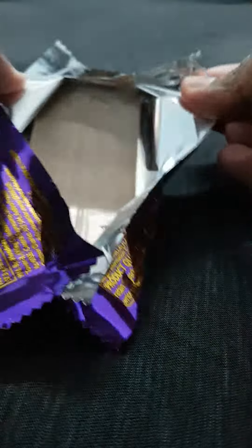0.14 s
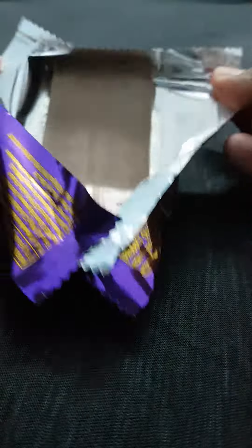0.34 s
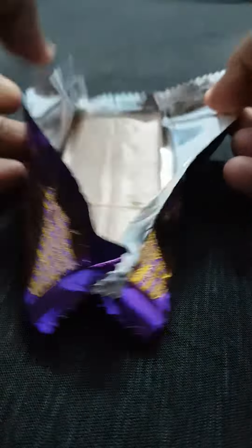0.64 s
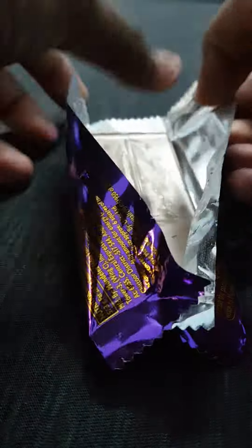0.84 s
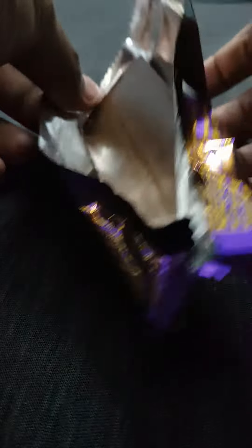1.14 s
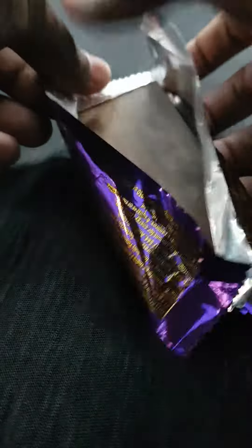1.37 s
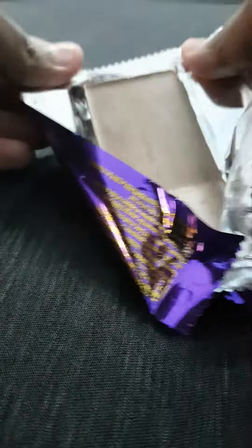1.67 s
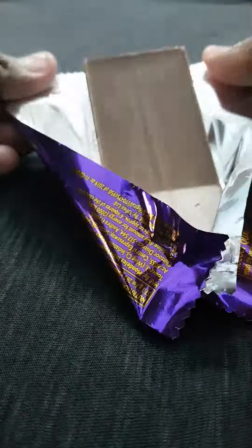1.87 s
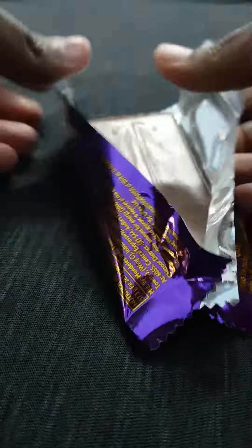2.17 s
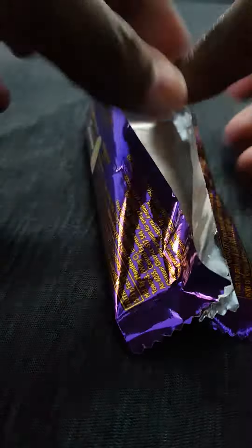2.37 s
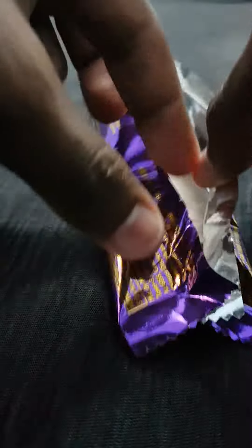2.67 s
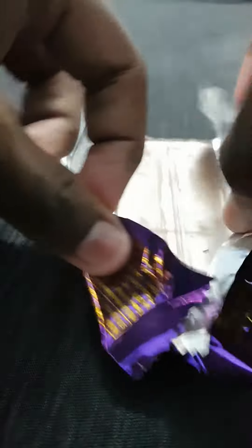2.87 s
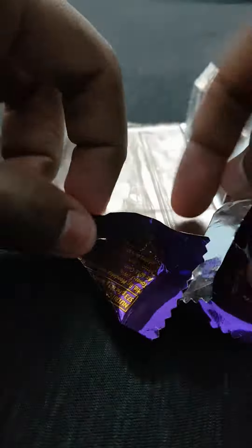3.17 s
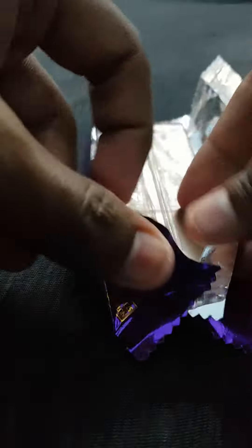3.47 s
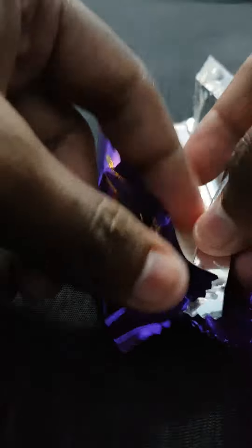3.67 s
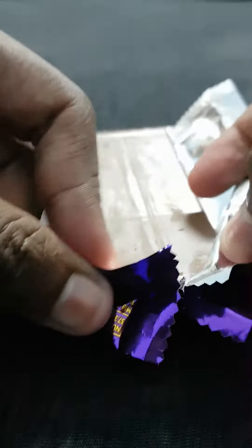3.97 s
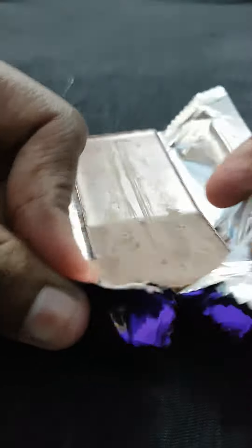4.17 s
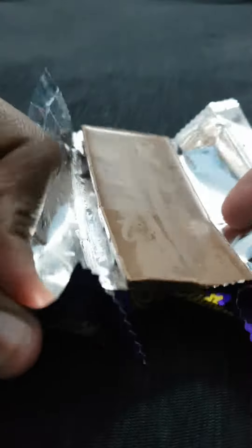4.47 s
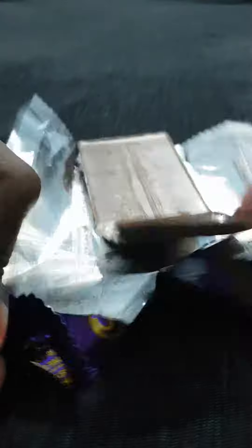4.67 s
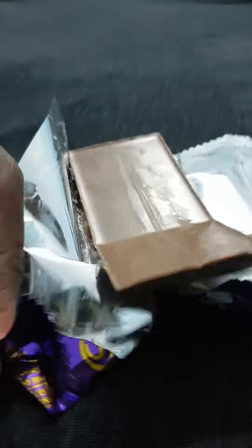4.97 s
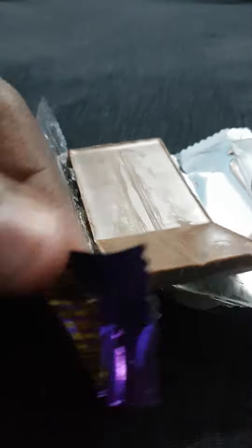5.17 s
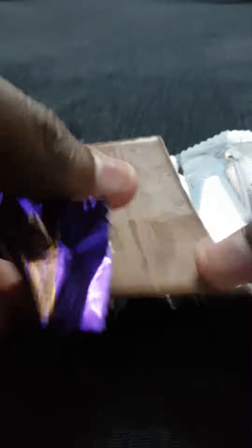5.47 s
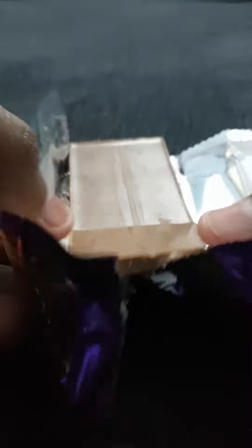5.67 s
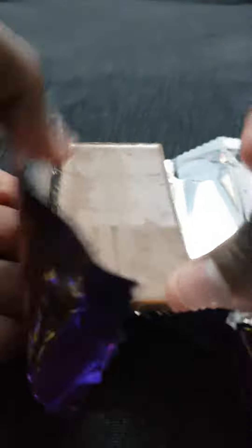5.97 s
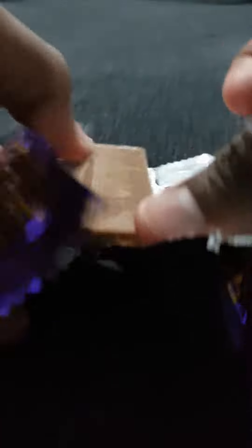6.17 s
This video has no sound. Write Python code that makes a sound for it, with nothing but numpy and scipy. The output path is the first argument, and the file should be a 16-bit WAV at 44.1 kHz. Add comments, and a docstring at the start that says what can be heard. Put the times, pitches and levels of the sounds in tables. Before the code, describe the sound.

Fingers crinkle and peel a stiff foil wrapper right at the microphone, irregular snaps densest after four seconds, over dull rubbing and quiet hiss

```python
"""Fingers peel a foil-lined wrapper off a chocolate bar on a cloth, a hand's width from a phone in a small room.
From the start, creases buckle with sharp cracks and short rings, made from shaped noise around a sudden step.
Between them come faint foil ticks, showers of tiny crackles and, from about one second, sine-wave bumps on the cloth.
After four seconds a foil flap slides free, made of dense random slips through a resonance; more snaps follow.
Throughout, filtered noise gives dull rubbing, a low fan-like rush and a soft hiss, and the room briefly echoes."""
import sys
import numpy as np
from scipy import signal
from scipy.fft import rfft, irfft
from scipy.io import wavfile
from scipy.ndimage import uniform_filter1d

SR = 44100
rng = np.random.default_rng(int(sys.argv[2]) if len(sys.argv) > 2 else 0)


def dump(signal):
    """Clip the signal to [-1, 1] and save it as 16-bit WAV at the path in sys.argv[1]."""
    limited = np.clip(np.atleast_2d(signal).T, -1, 1)
    pcm = np.round(limited * 32767).astype(np.int16)
    wavfile.write(sys.argv[1], SR, pcm)


N = 279153
TIME = np.arange(N) / SR  # seconds

# loud creases snapping through, level before left-right placing: start_s, energy_db, crack_hz, ring_hz
SNAPS = [(0.146, 4.5, 900, 7600), (0.1635, -2.5, 600, 5460), (0.1742, -4.5, 1560, 2290),
         (0.2634, 2.5, 6300, 5560), (0.2802, -4, 2620, 5710), (0.292, 2, 5030, 8100),
         (0.2984, 1.5, 1670, 5650), (0.302, -3, 990, 2230), (0.345, -6, 3110, 4580),
         (0.859, 1.5, 2170, 4550), (1.0926, 2.5, 5700, 5500), (1.1237, -1.0, 2230, 5200),
         (1.2484, 2, 2200, 2870), (1.318, -15, 9000, 12000), (1.5083, -2.5, 4000, 2170),
         (1.5461, 5, 2060, 5050), (1.7032, -3, 1680, 3130), (1.764, 3.5, 4800, 6600),
         (1.8262, 5, 1510, 1260), (1.835, -5.5, 1800, 3400), (1.8456, 4.5, 2400, 3460),
         (1.8553, -4.5, 2000, 4670), (2.0396, 1.5, 1340, 9200), (2.2245, 0, 1110, 4600),
         (2.2646, 0.5, 2410, 12000), (2.7892, -3.5, 1850, 6750), (2.8195, 3, 1650, 2090),
         (2.8344, 6, 3960, 1980), (2.8843, -1.5, 1700, 4800), (3.002, -4, 1650, 3650),
         (3.259, 1.5, 2040, 4870), (3.2847, 4, 2380, 4600), (3.3077, 0.5, 1730, 4500),
         (3.3415, 4.5, 3400, 6600), (3.6895, -7.5, 710, 825), (3.7459, 6.0, 3500, 1730),
         (3.8114, 1, 2960, 3920), (3.8906, 3.0, 2560, 1900), (3.9007, 6.5, 4040, 6600),
         (3.9702, 1, 3670, 5560), (4.1432, 4, 2200, 1970), (4.1906, 5.5, 2200, 4240),
         (4.195, 7.5, 1430, 4400), (4.2261, 7.5, 2620, 2170), (4.2297, 7.5, 1840, 6500),
         (4.2534, 0.5, 603, 2320), (4.358, 4, 1440, 1400), (4.399, 3.5, 3390, 1140),
         (4.6371, 3.5, 1310, 1980), (4.6482, -5, 1300, 2020), (4.6567, 8, 1690, 1170),
         (4.6697, 9, 2850, 3620), (4.6981, 6, 2030, 4100), (4.7073, 2, 1700, 6220),
         (4.7414, 1.5, 1550, 2300), (4.75, -2.5, 2620, 3420), (5.1495, -1.5, 1560, 5100),
         (5.2233, 0.5, 1390, 5370), (5.4528, -3, 3390, 1380), (5.5738, 0.5, 2850, 4730),
         (5.5948, 4.5, 2040, 5600), (5.6022, 2.5, 520, 5400), (6.1327, 3.5, 5870, 5650),
         (6.155, 0.5, 5710, 5960), (6.1986, 3, 1320, 5500), (6.2242, -3.5, 2020, 5960),
         (6.2516, -1.5, 2620, 3030)]
# patches of film crushed or dragged in one go, levels relative to each other: start_s, length_s, level_db, centre_hz
CRUSHES = [(0.61, 0.039, -36.5, 1970), (1.221, 0.17, -42.5, 2050), (2.036, 0.13, -41, 1970),
           (2.762, 0.071, -41.5, 2400), (3.299, 0.015, -29.5, 2660), (4.347, 0.048, -32.5, 1500),
           (4.634, 0.11, -34, 1460), (6.25, 0.046, -36.5, 3220)]
# faint ticks of the loose foil lining as it settles: start_s, energy_db
TICKS = [(0.1076, -12.5), (0.5503, -10), (0.652, -15), (0.6838, -5.5), (1.046, -15.5), (1.2301, -10),
         (1.239, -10), (1.301, -10), (1.3606, -14), (1.6005, -12.5), (1.693, -11), (1.7906, -11),
         (2.0016, -12.5), (2.1051, -14), (2.145, -6), (2.5956, -21.5), (2.6767, -10.5), (2.798, -11),
         (2.8044, -12), (2.965, -9.5), (3.071, -18.5), (3.155, -12), (3.1864, -16), (3.4858, -9.5),
         (3.5865, -13.5), (3.698, -11), (4.1084, -2), (4.1318, -7), (4.1396, -3.5), (4.918, -20.5),
         (5.0175, -21), (5.0524, -5.5), (5.4906, -10.5), (5.5476, -16), (5.625, -13), (5.8134, -11.5),
         (5.8723, -9), (5.932, -10), (6.001, -7.5), (6.0653, -12), (6.111, -12.5), (6.1427, -5.5)]
# soft knocks of bar and fingers: start_s, level_db, pitch_hz
BUMPS = [(1.019, -7.5, 136), (2.103, -5, 144), (2.43, -12, 151), (2.649, -11, 189), (2.927, -11.5, 120),
         (3.679, -13, 127), (4.354, -10.5, 280), (4.707, -11, 305), (4.721, -13, 249), (4.73, -10, 265),
         (5.337, -12.5, 163), (5.594, -18, 312)]
# rise and fall of hands shifting the bar on the cloth, relative: time_s, level_db
RUBBING = [(0.0, -46), (0.23, -56), (1.0, -33), (1.22, -41), (1.25, -31), (1.37, -38), (1.5, -34.5),
           (2.13, -36), (2.34, -54), (2.43, -36.5), (2.84, -54.5), (2.87, -33.5), (3.56, -49), (3.67, -31),
           (3.84, -45.5), (4.09, -34), (4.5, -49.5), (4.74, -36.5), (5.1, -45.5), (6.26, -41), (6.33, -31)]
# tone colour of the left microphone port: pitch_hz, gain_db
LEFT_PORT = [(100, 7.5), (400, 0), (700, 5), (2000, 0.5), (3300, 0.5), (4400, 0), (7700, -5), (8700, -7.5),
             (10500, -0.5), (15000, -8)]
# tone colour of the right microphone port: pitch_hz, gain_db
RIGHT_PORT = [(400, 8), (750, 3.5), (1300, -6.5), (2000, -8), (3000, -4), (4400, 3), (5700, -1),
              (6600, -9.5), (7800, -4.5), (9000, -13.5), (12000, -4), (15000, -11.5)]
# tone colour of the room's low rush, relative: pitch_hz, gain_db
RUSH = [(25, -19), (58, -8.5), (150, 3.5), (240, 2.5), (305, 1), (330, 4.5), (355, 0), (450, -4.5),
        (600, -16), (1200, -58)]
# slow swelling and sinking of the rush: time_s, level_db
SWELL = [(0, -46.5), (.8, -39), (2.5, -36.5), (5.4, -41), (6.33, -36)]
# tone colour of the room's broad hiss, relative: pitch_hz, gain_db
HISS = [(300, -10), (750, 4), (1400, 6.5), (2500, 1.5), (4400, -13.5), (7600, -14.5), (9000, -20),
        (15000, -27)]

FACET_HZ = 3000  # pitch of a middling facet, a small flat piece of film between creases
LEAD_S = 0.003  # time kept for creeping before a crease snaps
LAG_S = 0.00014  # usual extra delay of wrapper sounds at the right port
# the crack is broad; the ring is narrow and a little weaker
CRACK_Q, RING_Q, RING_DB = 0.62, 7.5, -1.5
# the sliding flap: at SLIDE_DECAY_S after its start the fade has reached half
SLIDE_S, SLIDE_DB, SLIDE_DECAY_S, SLIDE_HZ = 4.234, -23, 0.04, 2400
# bumps at this pitch reach both ports alike; deeper ones are weaker at the right port
BUMP_EVEN_HZ, BUMP_LEFT_DB_PER_OCTAVE = 310, 15
TOP_HZ = 15900  # upper edge of the sound the phone keeps


def amp(db):
    """Turn decibels into a gain."""
    return 10 ** (np.asarray(db) / 20)


def unit(x):
    """Scale to an average (rms) level of 1."""
    return x / np.sqrt(np.mean(x ** 2))


def unit_energy(x):
    """Scale so that the squared samples add up to 1."""
    return x / np.sqrt(np.sum(x ** 2))


def walk(rate):
    """Wander between random values, with rate new values a second and a spread near 1."""
    knots = rng.standard_normal(2048)
    return np.interp(TIME * rate, np.arange(len(knots)), knots)


def colour(x, points, size=4096):
    """Filter to the gains in (Hz, dB) points, with no sound ahead of its cause (minimum phase)."""
    hz, db = np.transpose(points)
    bin_hz = np.arange(size // 2 + 1) * SR / size
    gain_db = np.interp(np.log(bin_hz + 1), np.log(hz), db)
    cepstrum = irfft(np.log(amp(gain_db)))
    # fold the backward half onto the forward half
    cepstrum[1:size // 2] *= 2
    cepstrum[size // 2 + 1:] = 0
    response = irfft(np.exp(rfft(cepstrum)))
    return signal.fftconvolve(x, response)[:N]


def resonate(x, hz, q):
    """Boost one pitch region relative to the rest; a higher q makes it narrower and ring longer."""
    w = 2 * np.pi * hz / SR
    a = np.sin(w) / (2 * q)
    return signal.lfilter([a, 0, -a], [1 + a, -2 * np.cos(w), 1 - a], x)


def add(track, start, sound):
    """Mix a sound into a track at a time in seconds."""
    i = int(np.clip(start * SR, 0, N - 1))
    track[i:i + len(sound)] += sound[:N - i]


def snaps(pan_db=6.0, left_db=3, settle_s=1.0, aside=0.72):
    """Loud creases: each facet faces its own way, and the wrapper drifts from the left to the middle."""
    out = np.zeros((2, N))
    chances = rng.uniform(-1, 1, (len(SNAPS), 2))
    for (s, db, hz, ring_hz), (facing, place) in zip(SNAPS, chances):
        left = snap(hz, ring_hz)
        # the right port hears a partly different version of the same snap
        right = unit_energy(left + aside * snap(hz, ring_hz))
        pan = pan_db * facing + left_db * np.exp(-s / settle_s)
        lag = LAG_S * (1 + place / 2)
        add(out[0], s - LEAD_S, left * amp(db + pan / 2))
        add(out[1], s - LEAD_S + lag, right * amp(db - pan / 2))
    return out


def snap(hz, ring_hz):
    """A broad crack and the short ring of the facet that flipped, with energy 1."""
    crack = buckle(hz, CRACK_Q)
    ring = amp(RING_DB) * buckle(ring_hz, RING_Q)
    return unit_energy(crack + ring)


def buckle(hz, q, creep=0.55, creep_s=0.00053, slip=0.3, slip_s=0.0008, flutter=0.13, flutter_s=0.0016,
           even=0.36, leak=0.28, quicker=0.45, size=800):
    """A crease flips: tiny slips gather, a sharp step comes after LEAD_S, then the sheet flutters. Energy 1."""
    # small, high facets flip faster than large, low ones
    t = (np.arange(size) / SR - LEAD_S) * (hz / FACET_HZ) ** quicker
    before = creep * np.exp(-abs(t) / creep_s)
    after = slip * np.exp(-abs(t) / slip_s) + flutter * np.exp(-abs(t) / flutter_s)
    push = rng.standard_normal(size) * np.where(t < 0, before, after)
    push[int(LEAD_S * SR)] += 1
    # partly flatten the push over frequency, so the facet decides more of the colour
    spectrum = rfft(push)
    spectrum = spectrum / uniform_filter1d(abs(spectrum), size=7) ** even
    # long waves leak around a small facet instead of radiating
    wave = 1j * np.arange(len(spectrum)) * SR / size
    radiated = irfft(spectrum * wave / (wave + leak * hz))
    return unit_energy(resonate(radiated, hz, q))


def crushes(crush_db=4, per_s=420, octaves=1.0, spread_db=4, q=1.46, fade_db=-7):
    """Dense avalanches of creases that ease off as the film gives."""
    out = np.zeros((2, N))
    usual_db = np.mean([row[2] for row in CRUSHES])
    for s, length, db, hz in CRUSHES:
        n = int(length * SR)
        # a harder crush sets off more creases
        rate = np.full(n, per_s * amp(db - usual_db))
        grains = shower(rate, hz, octaves, spread_db, q)
        fade = fade_db * np.linspace(-0.5, 0.5, n)
        grains = grains * signal.windows.tukey(n, 0.2) * amp(db + crush_db + fade)
        for track, sound in zip(out, grains):
            add(track, s, sound)
    return out


def slide(q=6.5, scrape_db=-4, scrape_q=0.3, spread_db=2.5, per_s=1100):
    """Dense, uneven slips scrape the foil and keep the loose flap ringing while it slows and fades."""
    t = np.maximum(TIME - SLIDE_S, 0)
    sizes = amp(spread_db * np.minimum(rng.exponential(size=(2, N)), 4))
    slipping = rng.random((2, N)) < per_s / SR
    slips = sizes * rng.choice([-1, 1], (2, N)) * slipping
    ringing = unit(resonate(slips, SLIDE_HZ, q))
    scrape = amp(scrape_db) * unit(resonate(slips, SLIDE_HZ, scrape_q))
    rise = 1 - np.exp(-t / LEAD_S)  # silent until SLIDE_S
    fade = 1 / (1 + (t / SLIDE_DECAY_S) ** 2)
    return unit(ringing + scrape) * amp(SLIDE_DB) * rise * fade


def ticks(hz=3600, q=1.6):
    """Each tick is one small facet of foil, of a slightly different size every time."""
    out = np.zeros((2, N))
    for (s, db), octave in zip(TICKS, rng.uniform(-0.5, 0.5, len(TICKS))):
        for track, lag in zip(out, (0, LAG_S)):
            add(track, s - LEAD_S + lag, buckle(hz * 2 ** octave, q) * amp(db))
    return out


def crackle(crackle_db=-49.0, per_s=90, hz=2700, octaves=1, spread_db=2.0, q=3.0,
            follow=0.235, rest=0.12, build_s=0.022, relax_s=0.05):
    """Stray ticks grow thicker and louder as film strain builds before a snap, then relax after it."""
    t = TIME[::100]  # strain changes slowly, so a coarse clock will do
    strain = np.zeros(len(t))
    for s, db, _, _ in SNAPS:
        distance = np.maximum((s - t) / build_s, (t - s) / relax_s)
        strain += amp(follow * db) * np.exp(-distance)
    strain = rest + np.interp(TIME, t, strain / strain.mean())
    grains = shower(per_s * np.sqrt(strain), hz, octaves, spread_db, q, count=14)
    return grains * np.sqrt(strain) * amp(crackle_db)


def shower(per_s, hz, octaves, spread_db, q, count=6):
    """Random tiny creases, most weak and a few strong, on facets around hz; per_s is the rate at each sample."""
    n = len(per_s)
    out = np.zeros((2, n))
    lead, lag = int(LEAD_S * SR), int(LAG_S * SR)
    for facet_hz in hz * 2 ** np.linspace(-octaves, octaves, count):
        sizes = amp(spread_db * np.minimum(rng.exponential(size=n), 4))
        flips = rng.random(n) < per_s / SR / count
        clicks = flips * sizes * rng.choice([-1, 1], n)
        left = buckle(facet_hz, q)
        right = (left + buckle(facet_hz, q)) / np.sqrt(2)
        # start reading late, so each snap (not its creep) falls on its click
        out[0] += signal.oaconvolve(clicks, left)[lead:lead + n]
        out[1] += signal.oaconvolve(clicks, right)[lead - lag:lead - lag + n]
    return unit(out + 1e-12)  # the tiny offset avoids dividing by zero


def bumps(cycles=0.55, size=3000):
    """Knocks through the cloth die away within a couple of cycles; the deepest stay at the left port."""
    out = np.zeros((2, N))
    t = np.arange(size) / SR
    for s, db, hz in BUMPS:
        envelope = np.exp(-t * hz / cycles) * 2 * (1 - np.exp(-2 * t * hz))
        thud = amp(db) * np.sin(2 * np.pi * hz * t) * envelope
        right_db = BUMP_LEFT_DB_PER_OCTAVE * np.log2(hz / BUMP_EVEN_HZ)
        add(out[0], s, thud)
        add(out[1], s, thud * amp(right_db))
    return out


def handling(rub_db=4, right_db=-20, rub_hz=92, q=0.71, jerk_db=3, jerk_rate=50):
    """Hands and bar rub unevenly: dull, jerky noise, mostly at the nearer left port."""
    noise = rng.standard_normal((2, N))
    rub = resonate(resonate(noise, rub_hz, q), rub_hz, q)
    jerky = unit(rub * amp(jerk_db * walk(jerk_rate)))
    level_db = rub_db + np.interp(TIME, *np.transpose(RUBBING))
    return jerky * amp(level_db) * amp([[0], [right_db]])


def spill(spill_db=-2, sheet_hz=2900, sheet_q=0.7):
    """What the snaps send into the room: the broad colour of the whole sheet."""
    out = np.zeros(N)
    for s, db, _, _ in SNAPS:
        add(out, s - LEAD_S, buckle(sheet_hz, sheet_q) * amp(db + spill_db))
    return out


def room(x, wet_db=-12, t60_low=0.3, t60_high=0.45, build_s=0.0012, early_db=-17, early_s=0.00082):
    """Quick reflections from hands and table, plus a diffuse tail whose treble lasts longer than its low part."""
    t = np.arange(SR) / SR
    low_pass = signal.butter(2, 4000, fs=SR, output="sos")
    high_pass = signal.butter(2, 4000, "high", fs=SR, output="sos")
    low = signal.sosfilt(low_pass, rng.standard_normal((2, SR)))
    high = signal.sosfilt(high_pass, rng.standard_normal((2, SR)))
    # t60 is the time in seconds to fall by 60 dB
    tail = low * 1e-3 ** (t / t60_low) + high * 1e-3 ** (t / t60_high)
    tail = tail * (1 - np.exp(-t / build_s))
    early = rng.standard_normal((2, SR)) * np.exp(-t / early_s) * (1 - np.exp(-2 * t / early_s))
    response = (amp(wet_db) * unit(tail) + amp(early_db) * unit(early)) / np.sqrt(SR)
    return signal.fftconvolve(x, response, axes=1)[:, :N]


def rush(apart_db=-14, right_db=2):
    """Low fan-like rush: coloured noise, nearly alike at both ports, swelling and sinking slowly."""
    shared = unit(colour(rng.standard_normal(N), RUSH))
    apart = amp(apart_db) * unit(colour(rng.standard_normal(N), RUSH))
    level = amp(np.interp(TIME, *np.transpose(SWELL)))
    air = np.array([shared + apart, shared - apart]) * level
    return air * amp([[0], [right_db]])


def hiss(hiss_db=-45.5):
    """Soft broad air noise: steady coloured noise, different at each port."""
    air = [unit(colour(rng.standard_normal(N), HISS)) for _ in range(2)]
    return np.array(air) * amp(hiss_db)


def scene():
    """The wrapper in its room, heard through two ports, over the low sounds."""
    rustle = crushes() + slide() + ticks() + crackle()
    echoes = room(spill() + rustle)
    left, right = snaps() + rustle + echoes + hiss()
    ports = np.array([colour(left, LEFT_PORT), colour(right, RIGHT_PORT)])
    return ports + bumps() + handling() + rush()


def record(dry):
    """The phone rounds the tallest peaks (tanh) and cuts the treble above TOP_HZ."""
    rounded = np.tanh(dry)
    low_pass = signal.ellip(8, 0.2, 70, TOP_HZ, fs=SR, output="sos")
    return signal.sosfilt(low_pass, rounded)


dry = scene()
out = record(dry)
dump(out)
```